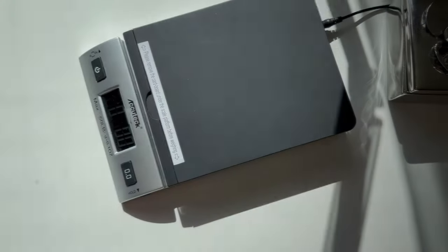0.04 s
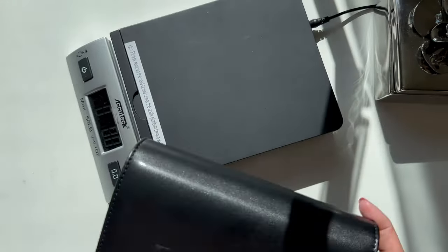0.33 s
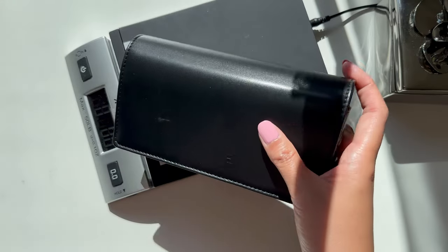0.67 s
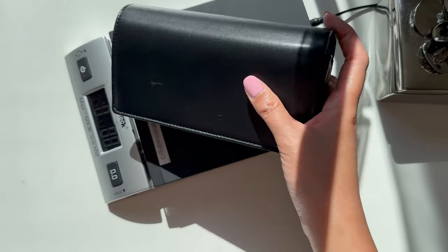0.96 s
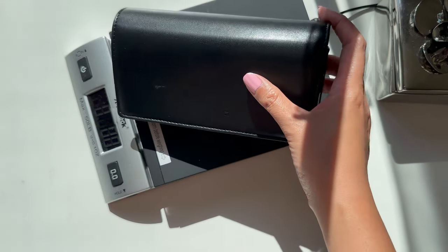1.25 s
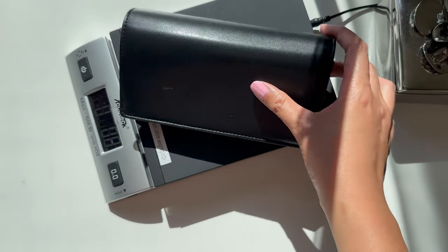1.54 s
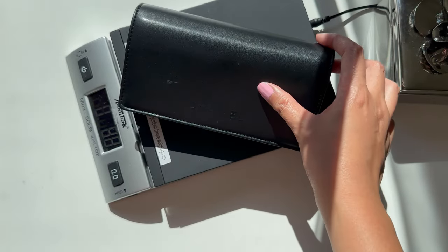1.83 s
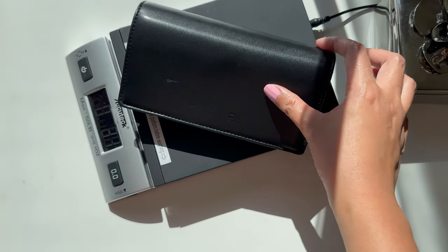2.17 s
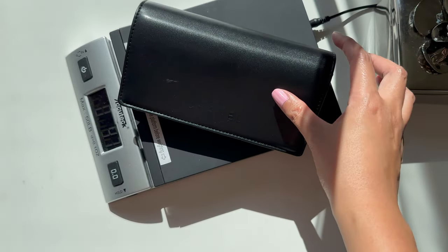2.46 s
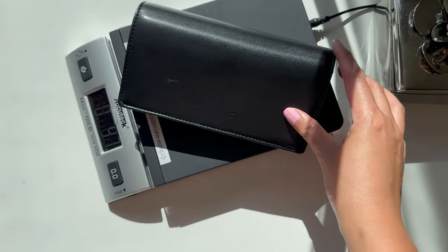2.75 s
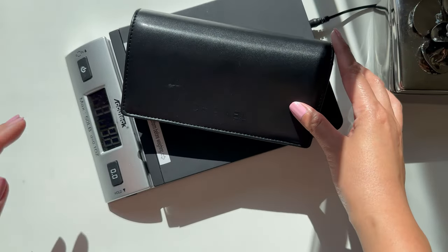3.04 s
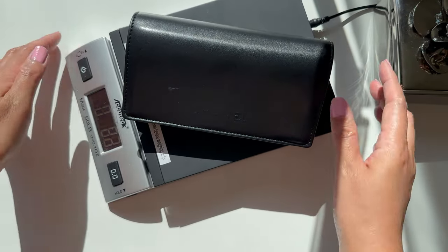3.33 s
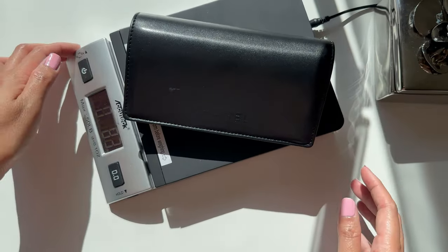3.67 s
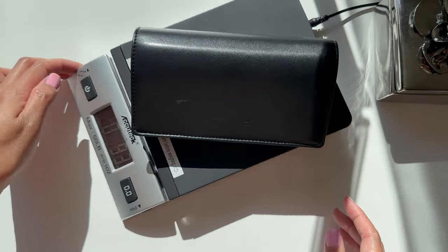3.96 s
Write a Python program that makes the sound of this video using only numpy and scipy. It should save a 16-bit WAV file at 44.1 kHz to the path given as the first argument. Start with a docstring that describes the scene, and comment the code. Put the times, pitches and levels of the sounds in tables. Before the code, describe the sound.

Close up in a quiet room, a hard case clicks and knocks onto a small scale, tips, and settles with a brief low thud. Faint finger taps and the rub of a hand on the table follow.

```python
"""Leather case on a small scale

A hard leather-covered case is set down on a small scale on a table, close by. One edge lands,
the case clicks as it tips, then its weight drops: case and platform ring together and the
platform bobs on its spring. Fingers let go and a hand slides over the table top, the skin
catching as it goes. A quiet room rumbles underneath."""
import sys
import numpy as np
from scipy import signal
from scipy.fft import rfft, irfft
from scipy.io import wavfile

SR = 44100
rng = np.random.default_rng(int(sys.argv[2]) if len(sys.argv) > 2 else 0)


def store_wav(level_fs):
    """Save 16-bit WAV to argv[1]."""
    pcm = np.round(np.clip(np.atleast_2d(level_fs), -1, 1) * 32767)
    wavfile.write(sys.argv[1], SR, pcm.T.astype(np.int16))


N = 176400
T = np.arange(SR // 2) / SR  # time axis of a one-shot, s
HZ = np.fft.rfftfreq(N, 1 / SR)


def amp(db):
    """Decibels to gain."""
    return 10 ** (np.asarray(db) / 20)


def unit(x):
    """Scales to rms 1."""
    return x / np.sqrt(np.mean(x ** 2) + 1e-20)


def curve(points, hz):
    """Reads breakpoints on a log-frequency axis."""
    f, value = np.transpose(points)
    return np.interp(np.log(hz + 1), np.log(f + 1), value)


def add(mix, start, sound):
    """Mixes a sound in at a time in seconds."""
    part = mix[round(start * SR):][:len(sound)]
    part += sound[:len(part)]


def noise(eq_db):
    """Noise of rms 1, coloured by an EQ curve."""
    return unit(irfft(rfft(rng.standard_normal(N)) * amp(eq_db), N))


def resonant_noise(peaks):
    """One band of noise for each resonance (f/Hz, width/Hz, level/dB)."""
    return sum(amp(db) * noise(-20 * np.log10(1 + (2 * (HZ - hz) / width) ** 2))
               for hz, width, db in peaks)


def tilted(eq, db_per_octave):
    """An EQ curve tilted around 2500 Hz; the tilt levels off below 400 Hz."""
    return curve(eq, HZ) + db_per_octave * np.log2(np.maximum(HZ, 400) / 2500)


def decay(t60):
    """An envelope that falls 60 dB in t60 seconds."""
    return np.exp(-np.log(1000) * T / t60)


def damped(x, t60s):
    """Lets each band of a noise die away at its own speed."""
    hz, t, bands = signal.stft(x[:len(T)], SR, nperseg=128)
    fade = amp(-60 * t / curve(t60s, hz)[:, None])
    return signal.istft(bands * fade, SR, nperseg=128)[1][:len(T)]


def ring(hz, t60):
    """One struck mode: a dying sine."""
    return np.sin(2 * np.pi * hz * T) * decay(t60)


def snap(eq_db):
    """A minimum-phase pulse of unit energy, coloured by an EQ curve."""
    log_gain = np.log(amp(np.concatenate([eq_db, eq_db[-2:0:-1]])))
    spectrum = np.exp(np.conj(signal.hilbert(log_gain)))
    pulse = np.fft.ifft(spectrum).real[:len(T)]
    return pulse / np.linalg.norm(pulse)


# EQ of the background bed: f/Hz, relative level/dB
ROOM_TONE_EQ = [(8, 8), (20, 4.5), (30, -4.5), (45, -8), (62, -22.5), (80, -20.5), (125, -24.5), (170, -26),
                (270, -28.5), (350, -28.5), (440, -33.5), (640, -34.5), (850, -36), (1250, -40.5),
                (1600, -48.5), (2300, -50), (4500, -52.5), (9500, -55.5), (15500, -60.5)]
# drones in the room: f/Hz, width/Hz, level/dB
DRONES = [(90.5, 5.7, -71), (243.8, 31, -75.5), (582.4, 9.7, -80), (1155, 420, -76.5)]
def room_tone():
    """A bed of rumble and hiss with a few faint drones."""
    return amp(-44.5) * noise(curve(ROOM_TONE_EQ, HZ)) + resonant_noise(DRONES)


# reverb time by band: f/Hz, t60/s
REVERB_DECAY = [(150, 0.29), (1000, 0.2), (4000, 0.26), (12000, 0.18)]
def room_reverb(send, fade_in_s=0.0034):
    """The short diffuse tail of a small room."""
    onset = np.clip(T / fade_in_s - .5, 0, 1)
    tail = damped(rng.standard_normal(len(T)), REVERB_DECAY) * onset
    return signal.fftconvolve(send, tail / np.linalg.norm(tail))[:N]


def close_reflections(x, t60=0.021, wet_db=-2):
    """Reflections off the table and the scale add a comb-like colour to the treble."""
    echoes = rng.standard_normal(len(T)) * decay(t60)
    echoes = signal.sosfilt(signal.butter(2, 2500, "high", fs=SR, output="sos"), echoes)
    return x + amp(wet_db) * signal.fftconvolve(x, echoes / np.linalg.norm(echoes))[:N]


def skin_catches(per_second=410, spread_db=7):
    """Tiny catches of the skin, most of them faint and a few strong."""
    size = amp(spread_db * np.minimum(rng.exponential(1, N), np.pi))
    return unit(size * rng.choice([-1, 1], N) * (rng.random(N) < per_second / SR))


# EQ of the noise burst in a tap or knock: f/Hz, relative level/dB
CLATTER_EQ = [(100, 13.5), (300, 14.5), (600, 5), (1000, -16), (1400, 1), (2500, -5), (3500, -1),
              (6000, -6), (15000, -20)]
# its decay by band: f/Hz, t60/s
CLATTER_DECAY = [(150, 0.056), (1000, 0.061), (4000, 0.012), (12000, 0.018)]
def clatter(cutoff_hz, attack_s=0.00063):
    """Many short overlapping modes; a softer contact leaves out the high ones."""
    high_cut_db = 10 * np.log10(1 + (HZ / cutoff_hz) ** 2)
    low_cut_db = 10 * np.log10(1 + (60 / (HZ + 1)) ** 4)
    burst = noise(curve(CLATTER_EQ, HZ) - high_cut_db - low_cut_db)
    return damped(burst, CLATTER_DECAY) * (1 - np.exp(-T / attack_s))


# resonances of the table top: f/Hz, width/Hz, relative level/dB
TABLE_MODES = [(638, 53, 6), (983, 58, 0), (1142, 73, -1.5), (1340, 40, -3), (1651, 50, -4),
               (1933, 72, -8.5), (2132, 39, -21.5), (2360, 60, -19), (2886, 40, -21), (4380, 110, -12),
               (5460, 77, -18), (7030, 130, -13)]
# EQ of the friction: f/Hz, relative level/dB
FRICTION_EQ = [(80, 0), (250, 11), (480, 7.5), (650, 1.5), (850, 0.5), (1200, 6.5), (2000, -2), (2700, -10),
               (4500, -16), (7000, -16), (11000, -24.5), (15500, -22)]
# skin and leather sliding: t/s, attack/s, hold/s, release/s, level/dB, tilt/(dB per octave)
STROKES = [(0.313, 0.004, 0.014, 0.052, -71, 3), (0.366, 0.058, 0.7, 0.12, -83.5, 4.5),
           (1.17, 0.015, 0.068, 0.021, -72, 4.5), (1.605, 0.057, 0.099, 0.024, -75.5, 4),
           (3.052, 0.078, 0.21, 0.2, -77.5, 3.5), (3.38, 0.0065, 0.085, 0.08, -60.5, 1.5),
           (3.499, 0.015, 0.016, 0.072, -62.5, 0), (3.647, 0.19, 0.16, 0.047, -64.5, 1),
           (3.875, 0.066, 0.024, .08, -73.5, 8)]
# fingers landing on the case or the table: t/s, level/dB, cutoff/Hz
FINGER_TAPS = [(0.32, -59, 1000), (3.387, -45, 700), (3.735, -49.5, 1300), (3.788, -53.5, 2500),
               (3.973, -49.5, 2000)]
def hands(grain_db=3, grain_s=0.0011, top_hz=12500):
    """Fingers land with soft taps, and slide and catch on the table top, which rings."""
    out, t = np.zeros(N), np.arange(N) / SR
    rubbed_table = amp(-10.5) * resonant_noise(TABLE_MODES)
    grit = signal.fftconvolve(skin_catches(), snap(curve(FRICTION_EQ, HZ)))[:N]
    grit = amp(-6.5) * unit(grit)
    high_cut_db = 10 * np.log10(1 + (HZ / top_hz) ** 10)
    for start, attack, hold, release, db, tilt in STROKES:
        envelope = np.interp(t, start + np.cumsum([0, attack, hold, release]), [0, 1, 1, 0])
        flutter = noise(-20 * np.log10(1 + (HZ * grain_s) ** 2))
        grain = unit(amp(grain_db * flutter))  # fast level jitter roughens the hiss
        friction = grain * noise(tilted(FRICTION_EQ, tilt) - high_cut_db)
        out += amp(db) * envelope * (friction + rubbed_table + grit)
    tapped_table = sum((-1) ** k * amp(db) * ring(hz, np.log(1000) / np.pi / width)
                       for k, (hz, width, db) in enumerate(TABLE_MODES))
    for start, db, cutoff_hz in FINGER_TAPS:
        add(out, start, amp(db) * (clatter(cutoff_hz) + amp(-9.5) * tapped_table))
    return out


# EQ of a click: f/Hz, relative level/dB
CLICK_EQ = [(200, -30), (700, -2.5), (1500, -0.5), (2300, -5.5), (3500, -4), (5000, -13.5), (7000, -10),
            (11000, -10), (15500, -22.5)]
# small sharp contacts of case and nails: t/s, level/dB, tilt/(dB per octave)
CLICK_CUES = [(.1775, -60, -3), (0.32, -35.5, -6), (0.49, -58, -2), (0.509, -47, -2), (0.619, -50, -0.5),
              (1.0684, -30.5, -1), (1.1885, -39, 1.5), (1.2145, -31, -1), (1.389, -49, -1.5),
              (1.6858, -29.5, -5.5), (1.695, -51, 5), (2.377, -50, 0), (3.335, -52, -2.5),
              (3.355, -43, -4.5), (3.591, -46.5, -2.5)]
def clicks(snap_db=1.5, rattle_db=-0.5, rattle_t60=0.02):
    """Each sharp contact is a bright snap followed by a brief rattle."""
    out = np.zeros(N)
    for start, db, tilt in CLICK_CUES:
        pulse = snap(tilted(CLICK_EQ, tilt))
        burst = rng.standard_normal(len(T)) * decay(rattle_t60)
        rattle = signal.fftconvolve(pulse, burst / np.linalg.norm(burst))
        add(out, start, amp(db + snap_db) * pulse)
        add(out, start, amp(db + rattle_db) * rattle)
    return out


# modes of case and platform together: f/Hz, relative level/dB, t60/s
CASE_MODES = [(158.3, -3.5, 0.35), (242, -1, 0.15), (298, -0.5, 0.056), (358, 0.5, 0.13),
              (469, -0.5, 0.083), (591.6, -4.5, 0.24), (719.5, -8.5, 0.24), (789, -17.5, 0.16),
              (1138, 4, 0.067), (1304, 7.5, 0.089), (1625, 19, 0.079), (2220, 14, 0.074)]
# the case landing on the platform: t/s, thump/dB, spring bob/dB, ring/dB,
# pitch favoured by the struck spot/Hz, clatter/dB, clatter cutoff/Hz
LANDINGS = [(1.0632, -42, -70, -42, 740, -43.5, 900), (1.0665, -26.5, -40, -45.5, 320, -49, 4000),
            (1.094, -37, -46, -43, 165, -64, 700), (1.1855, -82, -65, -44, 564, -57, 900),
            (1.2135, -47, -80, -49.5, 590, -47.5, 4000), (1.6863, -41, -27, -40.5, 293, -39.5, 2600),
            (1.6912, -57, -57, -43.5, 815, -45, 1800), (1.699, -59, -51, -41, 238, -40, 1200),
            (1.711, -52, -60, -50.5, 460, -51, 700), (1.7779, -37, -65, -45, 560, -49, 350),
            (1.789, -42, -65, -51, 302, -53.5, 300)]
def case_knocks(spot_db_per_octave=32.5):
    """Each landing thumps the table, bobs the platform on its spring and rings the case."""
    low_end, body = np.zeros(N), np.zeros(N)
    thump, bob = ring(hz=91.6, t60=0.064), ring(hz=64.9, t60=0.445)
    for start, thump_db, bob_db, ring_db, spot_hz, clatter_db, cutoff_hz in LANDINGS:
        add(low_end, start, amp(thump_db) * thump + amp(bob_db) * bob)
        modes = np.zeros(len(T))
        for k, (hz, db, t60) in enumerate(CASE_MODES):
            off_spot_db = spot_db_per_octave * abs(np.log2(hz / spot_hz))
            modes += (-1) ** k * amp(db - off_spot_db) * ring(hz, t60)
        add(body, start, amp(ring_db) * modes + amp(clatter_db) * clatter(cutoff_hz))
    return low_end, body


def scene():
    """Knocks, clicks and hands over room tone, in mono; thump and bob stay dry."""
    low_end, body = case_knocks()
    ticks = clicks()
    handling = close_reflections(hands())
    reverb = room_reverb(amp(-8) * body + amp(-4) * ticks + amp(-5.5) * handling)
    return (low_end + body + ticks + handling + reverb + room_tone())[None]


def record(dry, cutoff_hz=15850):
    """A steep low-pass on the whole mix."""
    low_pass = signal.firwin(511, cutoff_hz, window=("kaiser", 9), fs=SR)
    return signal.oaconvolve(dry, low_pass[None], "same")


dry = scene()
out = record(dry)
store_wav(out)
```